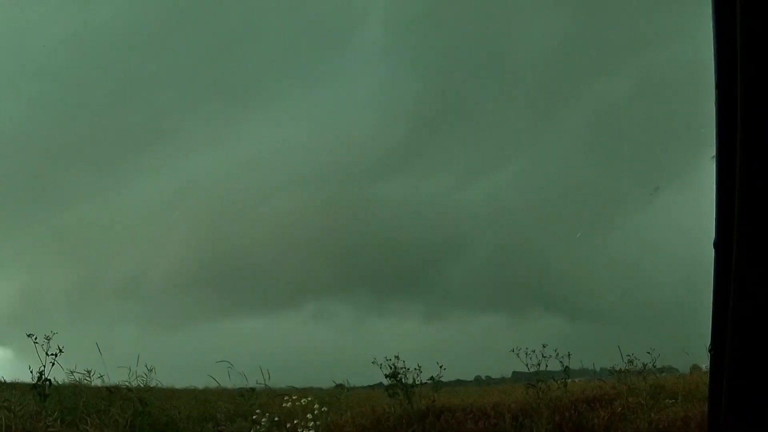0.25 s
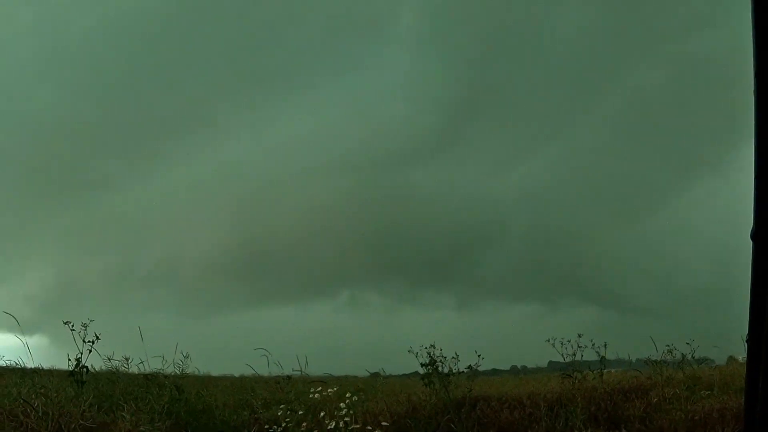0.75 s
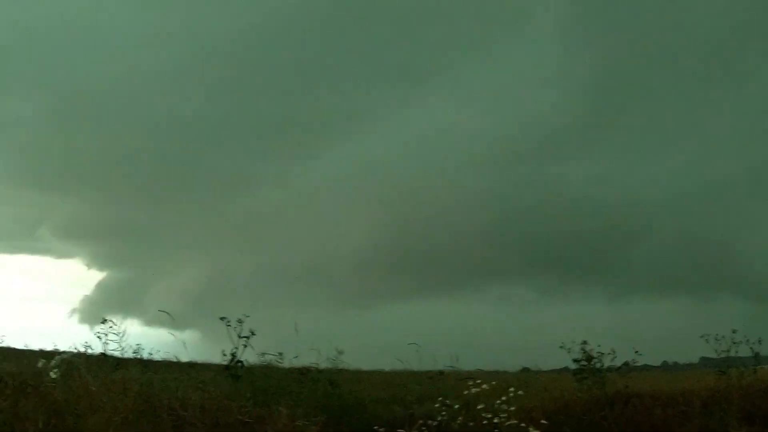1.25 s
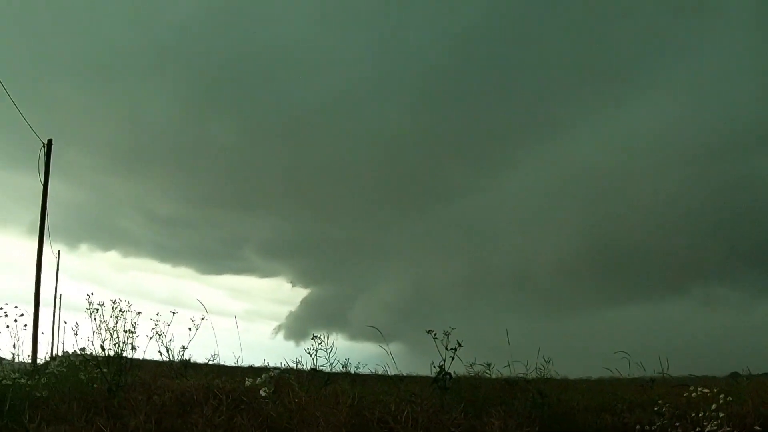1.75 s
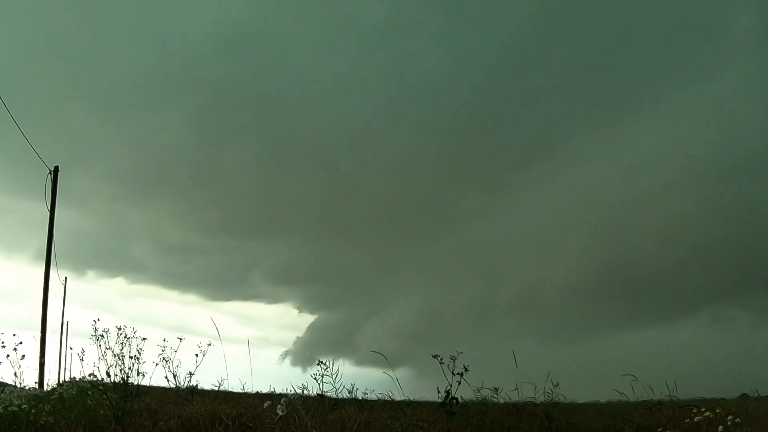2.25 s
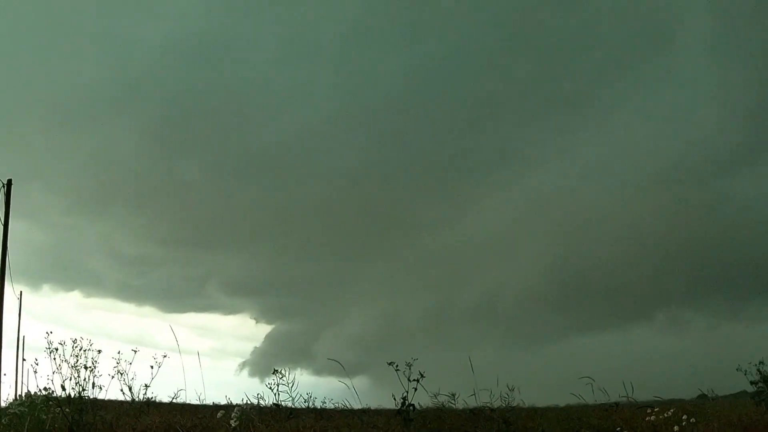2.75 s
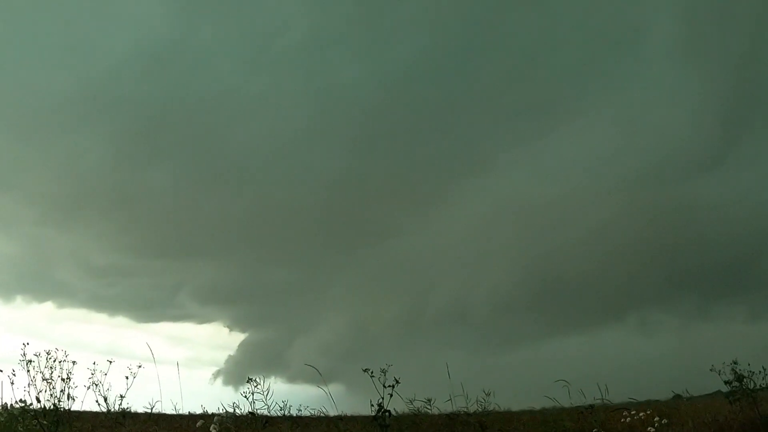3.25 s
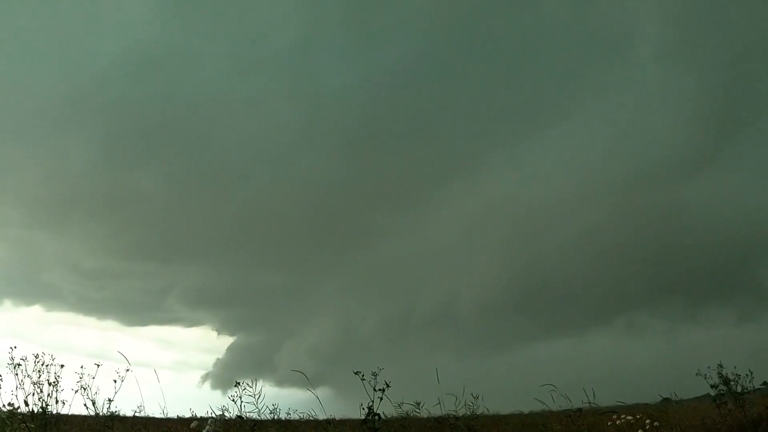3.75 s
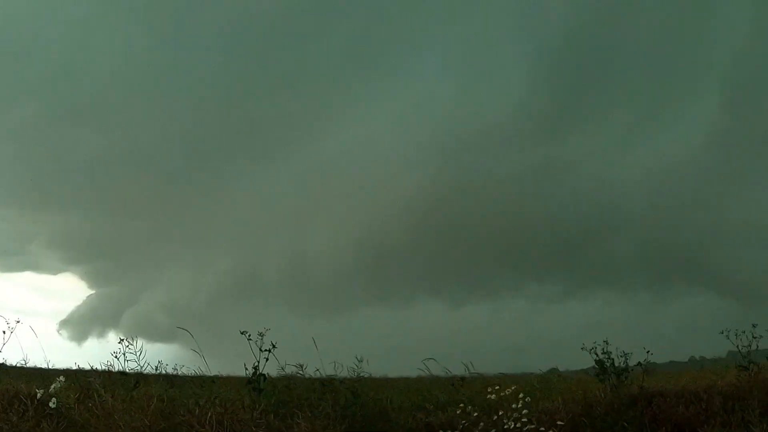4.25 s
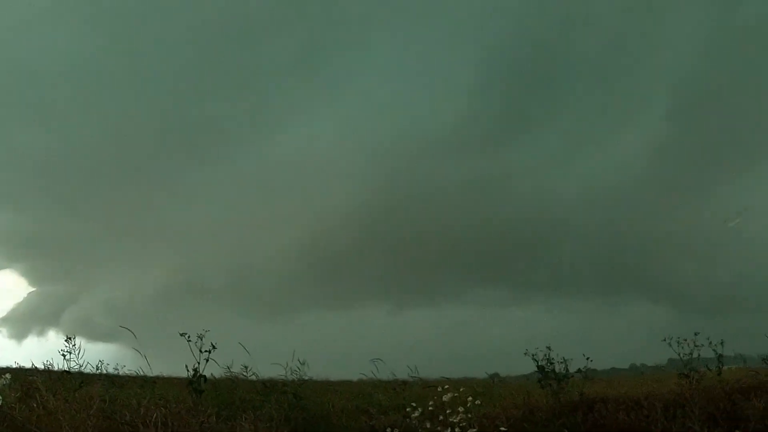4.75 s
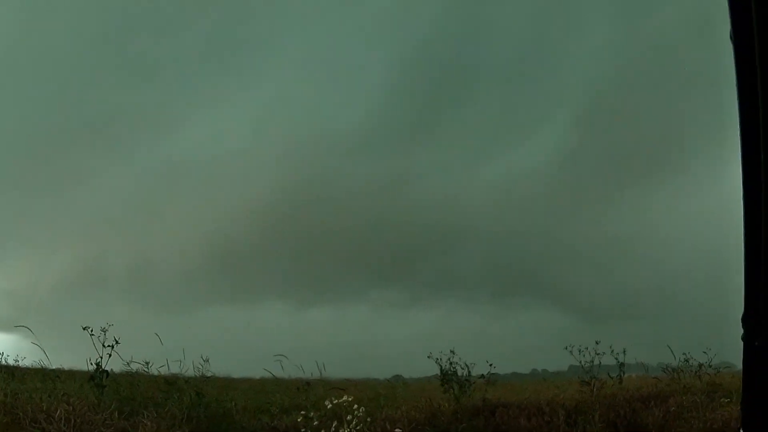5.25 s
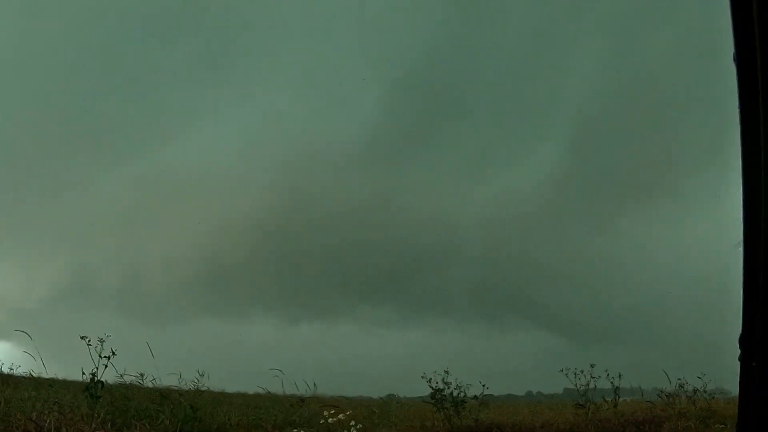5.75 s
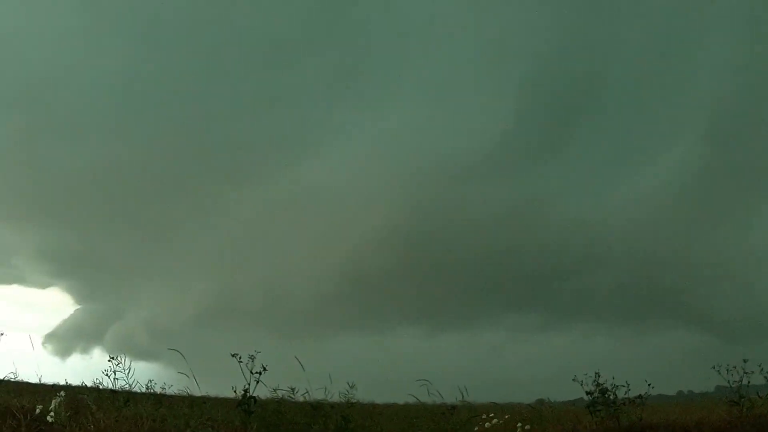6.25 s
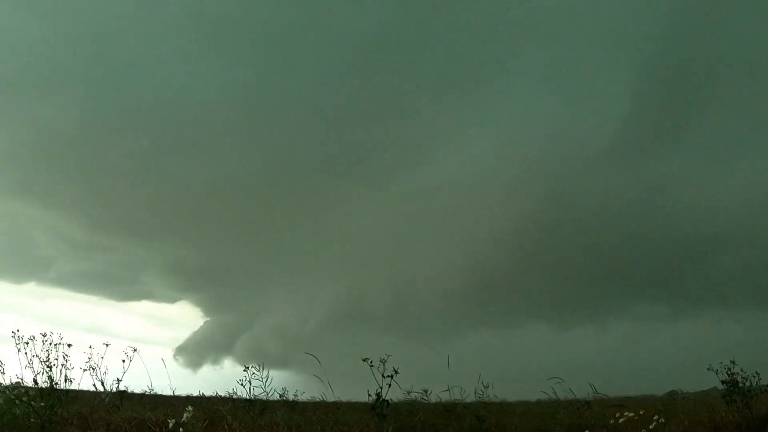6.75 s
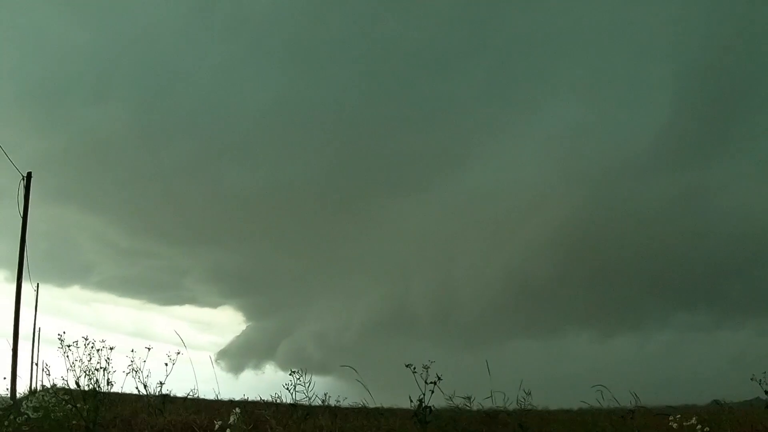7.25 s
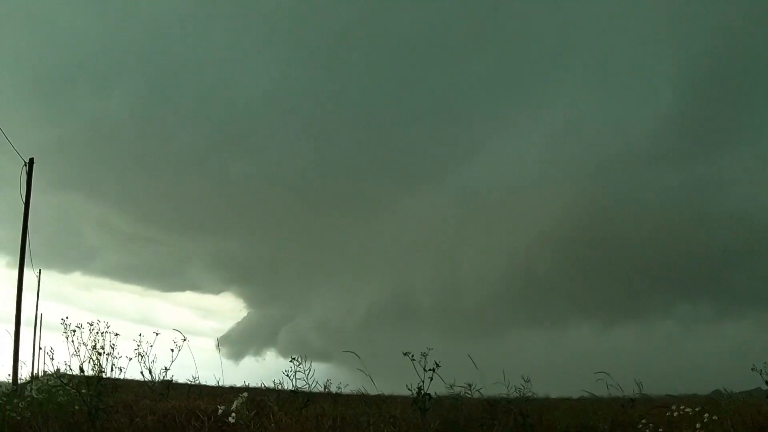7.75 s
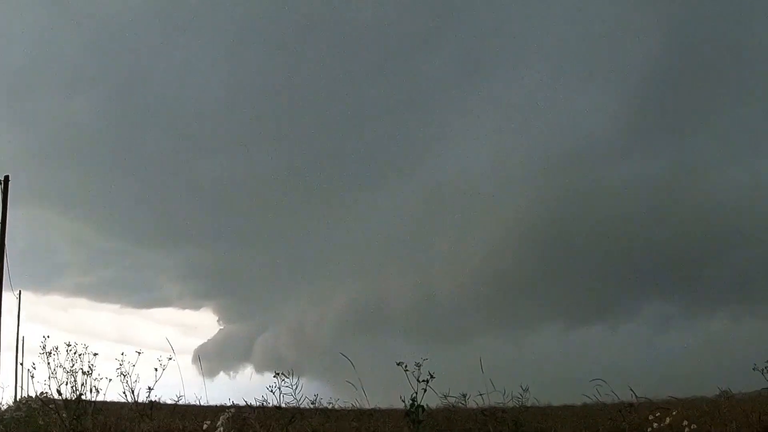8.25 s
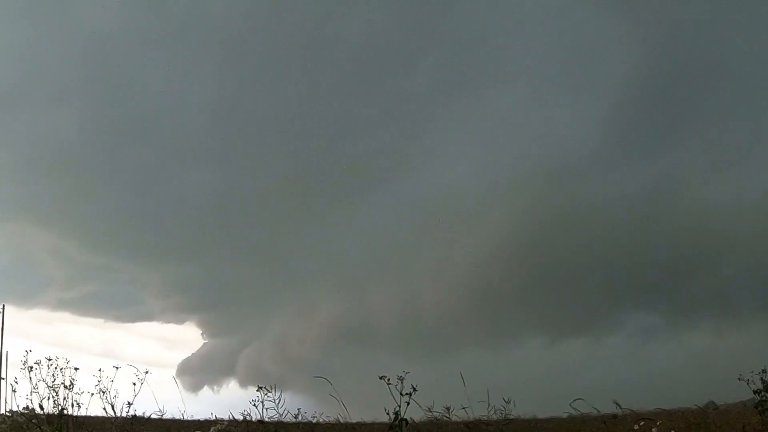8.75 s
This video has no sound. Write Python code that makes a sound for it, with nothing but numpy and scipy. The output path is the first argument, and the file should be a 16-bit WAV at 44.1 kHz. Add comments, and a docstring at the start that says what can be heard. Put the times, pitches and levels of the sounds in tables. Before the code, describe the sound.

From inside a car, a muffled downpour turns wide and loud, drops ticking near the window over deep gusty booms, then abruptly dulls again.

```python
"""Heavy rain drums on the body of a car and splashes outside, as noise full of random drops; open fields around.
The microphone is in the cabin: fat drops smack on the roof, near ones tick on the window frame (noise bursts),
small ones plink on the glass (resonances), faint, very high crackles sound at the top, and the wipers thud
(resonant noise) as they turn. Behind, wind and far thunder boom as low noise, jolts ring the cabin, and draught
and gusts reach the microphone. From 0.15 s until about 2.5 s, and again from 8.1 s, it is narrow and muffled."""
import sys
import numpy as np
from scipy import signal
from scipy.fft import rfft, irfft, next_fast_len
from scipy.io import wavfile
from scipy.ndimage import uniform_filter1d

SR = 44100
rng = np.random.default_rng(int(sys.argv[2]) if len(sys.argv) > 2 else 0)


def dump(signal):
    """Clip the signal to [-1, 1] and save it as 16-bit WAV at the path in sys.argv[1]."""
    limited = np.clip(np.atleast_2d(signal).T, -1, 1)
    pcm = np.round(limited * 32767).astype(np.int16)
    wavfile.write(sys.argv[1], SR, pcm)


N = 397341
TIME = np.arange(N) / SR
CUTOFF_HZ = 15750

# the downpour, in plateaus and sudden steps: (time [s], drumming [dB], splash [dB])
DOWNPOUR_LEVELS = [(0.148, -50, -62), (0.155, -46, -57.5), (2.3, -46.5, -58.5), (2.7, -45, -54),
                   (2.9, -43, -52.5), (4.148, -41.5, -51), (4.151, -36.5, -45.5), (4.85, -36.5, -44.5),
                   (7.5, -37, -45), (8.112, -35, -45.5), (8.118, -39, -53), (9.0, -37.5, -52)]
# sheets of rain that the wind throws on the car, and lulls: (time of the height [s], half length [s], rise [dB])
RAIN_SHEETS = [(0.612, 0.036, -2), (0.86, 0.055, 2.5), (0.956, 0.05, 4.5), (1.904, 0.041, 3.5),
               (2.047, .02, 3), (2.386, 0.022, 1.5), (2.76, 0.03, -4), (2.816, 0.026, 5),
               (2.94, 0.062, 2.5), (3.193, 0.039, 3), (3.778, 0.05, 2.5), (3.916, 0.036, -3),
               (3.998, 0.0092, 7.5), (4.115, 0.018, -3), (4.168, 0.012, 2), (4.868, 0.11, 1.4),
               (5.633, 0.036, 2.5), (6.421, 0.022, 2.5), (6.512, 0.028, 5.5), (7.56, .025, -3.5),
               (7.72, 0.013, 5), (8.192, 0.039, 6.5)]
# share of the narrow, muffled sound: (time [s], share [0-1])
NARROW_SHARE = [(.148, 0), (.155, 1), (2.09, 0.87), (2.55, 0.24), (2.8, 0.07), (8.112, 0.07), (8.118, 1)]
# rain colour when wide and clear: (frequency [Hz], relative density [dB])
CLEAR_COLOUR = [(100, -8), (300, 5.5), (480, 4.5), (700, 0), (1300, -1), (2300, -8), (3300, -10),
                (4500, -16.5), (6100, -9.5), (7600, -17), (8600, -22), (11000, -23.5), (15000, -26.5)]
# rain colour when narrow and muffled: (frequency [Hz], relative density [dB])
MUFFLED_COLOUR = [(100, -6.5), (330, 7.5), (750, 2), (950, -1), (1750, -3.5), (2800, -13.5), (3900, -8),
                  (4900, -11.5), (6400, -30.5), (8100, -32.5), (11100, -46), (12200, -27.5)]
# likeness of the rain at the two ears, later limited to -0.5..0.98: (frequency [Hz], likeness [-])
EAR_LIKENESS = [(290, 1.5), (640, 0.32), (1410, 0.03), (3100, 0.25), (6800, -0.1), (15000, -0.37)]
# balance of the wide rain: (frequency [Hz], left over right [dB])
RAIN_BALANCE = [(200, -4.5), (400, -5), (700, -3.5), (1300, 0.5), (2400, 1), (4400, -3), (8000, .5)]
# thin rain before the sound first turns narrow: (frequency [Hz], gain [dB])
THIN_START = [(300, -2), (480, -10), (1000, 3.5), (2600, 6), (4000, 4), (7000, -7.5)]
# a little more fizz in the muffled rain at the end: (frequency [Hz], gain [dB])
FIZZY_END = [(1300, -0.5), (3200, -3.5), (7000, 3.5), (10500, 2.5)]
# airy top of the rain, which dips briefly when the sound turns narrow again: (time [s], gain [dB])
AIRY_TOP = [(8.112, -6), (8.118, -28), (8.3, -20), (8.4, -6)]
# fat drops on the roof: (time [s], peak level [dB], bright splat against dull knock [dB])
ROOF_SMACKS = [(0.474, -38, -17), (0.575, -33.5, 1), (0.727, -36.5, -1), (0.808, -34, 0),
               (0.819, -29.5, -2), (0.935, -41, -7), (1.116, -33, -7), (1.511, -34, -9), (1.576, -31.5, -8),
               (1.889, -33, 0), (1.898, -37, -3), (1.995, -32, -7), (2.347, -34, -6), (2.388, -33.5, -14),
               (3.654, -33, -6), (3.947, -35, -12), (8.365, -29, -8)]
# near drops on the window frame:
# (time [s], peak level before balance [dB], pitch [Hz], left over right [dB], crack gain [dB])
FRAME_TICKS = [(3.434, -26, 5800, -11, -16.5), (3.7624, -30, 6500, 6, -9), (4.7255, -29, 4940, -.5, -33),
               (4.896, -29.5, 5700, 0.5, -16), (5.025, -32, 6000, -3.5, -26), (5.051, -22, 7360, 5, -14),
               (5.1986, -27, 6300, -3, -13), (5.259, -28.5, 5760, 0, -28), (5.461, -26, 4700, 7, -18),
               (5.503, -19.5, 4360, -2, -26), (5.504, -17, 6100, 5, -23), (6.223, -28, 5900, 6, -18),
               (6.527, -26, 5400, 6, -31), (7.172, -27, 3640, -6, -31), (7.861, -18, 5800, 4, -19),
               (8.045, -25.5, 5670, 1, -24)]
# clear high crackles: (time [s], peak level [dB])
CLEAR_CRACKLES = [(1.5646, -42), (1.7457, -47), (2.1104, -50), (6.588, -33)]
# wiper turns: (time [s], thud level [dB], cabin boom level [dB])
WIPER_TURNS = [(0.306, -36, -40), (.85, -43, -38.5), (1.3, -41, -43), (2.32, -37, -35.5),
               (3.31, -38, -37.5), (4.28, -40.5, -42), (4.83, -31.5, -39), (5.84, -39.5, -39),
               (6.83, -38, -43), (7.82, -37, -32.5), (8.32, -37, -40)]
WIPER_BOOM_LAG_S, WIPER_BOOM_S = 0.056, 0.091   # the cabin booms just after each turn: delay, half length
# steady wind under the rolls: (time [s], cabin boom level [dB], deep rumble level [dB])
STEADY_WIND = [(0.0, -47.5, -49), (.14, -44.5, -52), (.2, -39, -50), (1.3, -42.5, -45), (1.75, -44, -57),
               (2.2, -43, -45.5), (3.6, -44, -42), (5.55, -39.5, -44), (6.5, -37, -42), (8.1, -34, -41),
               (8.2, -34.5, -60), (9.0, -36, -44)]
# rolls of wind and far thunder: (start time [s], hold [s], cabin boom level [dB], deep rumble level [dB])
STORM_ROLLS = [(0.143, 0.018, -44, -43), (0.265, 0.0091, -42, -35), (0.46, 0.048, -37.5, -54),
               (0.747, 0.042, -36.5, -53), (.84, .01, -48, -33.5), (1.1, 0.047, -44, -38),
               (1.354, .16, -39.5, -45), (1.8, .03, -38, -46), (1.945, 0.1, -43, -34.5),
               (2.28, 0.12, -42, -41), (2.768, 0.13, -42, -38.5), (2.91, 0.027, -55, -33),
               (3.075, 0.3, -42, -33.5), (3.543, 0.057, -40.5, -33), (3.728, 0.35, -39, -34),
               (4.17, 0.21, -37, -57), (4.673, 0.065, -45, -34.5), (4.755, 0.17, -36, -34.5),
               (5.005, 0.21, -36.5, -36.5), (5.332, 0.044, -32, -46), (5.71, 0.12, -35.5, -45),
               (5.84, 0.11, -45, -31.5), (6.167, 0.026, -34, -37), (6.478, 0.13, -43, -40),
               (6.773, 0.23, -31, -35.5), (7.15, 0.16, -28.5, -38), (7.405, 0.069, -28.5, -49),
               (7.59, .03, -29.5, -48), (7.686, 0.13, -30.5, -33), (8.004, 0.027, -33.5, -32),
               (8.257, 0.23, -33.5, -35), (8.49, 0.027, -33, -48), (8.81, 0.13, -52, -41)]
ROLL_ATTACK_S, ROLL_RELEASE_S = 0.047, 0.048   # rise time, time constant of the fade
# colour of the cabin boom: (frequency [Hz], relative density [dB])
BOOM_COLOUR = [(30, -47), (65, -28), (95, -14), (125, -1.5), (168, 0.3), (205, -3), (240, -9.5),
               (300, -17.5), (500, -47), (2000, -110)]
# colour of the deep rumble: (frequency [Hz], relative density [dB])
RUMBLE_COLOUR = [(5, -38), (22, 5), (33, -5), (46, 15), (60, 2.5), (80, -8.5), (130, -32), (1000, -110)]
# jolts of wind that set the cabin ringing: (time [s], peak of the swing [dB], pitch [Hz])
CABIN_THUMPS = [(.385, -21, 168), (1.305, -25, 169), (3.845, -26, 160), (4.963, -20, 135),
                (8.334, -21.5, 170)]
# gusts that bump the microphone: (time [s], peak level before balance [dB], pitch [Hz], left over right [dB])
MICROPHONE_BUFFETS = [(3.217, -20, 69, -19), (3.317, -21, 59.7, -11), (3.867, -24.5, 73.5, -5),
                      (4.006, -17.5, 75, -18), (4.087, -18.5, 71, -10), (4.145, -19.5, 87, -22),
                      (4.959, -23, 116, -6), (5.901, -19, 55, 1), (5.928, -22, 37.6, -12),
                      (7.812, -16, 95, -2), (7.908, -17, 110, -5)]


def from_db(db):
    """Decibels to gain."""
    return 10 ** (np.asarray(db) / 20)


def rms_one(x):
    """Scale to rms 1."""
    return x / np.sqrt(np.mean(x ** 2) + 1e-20)


def in_time(rows):
    """One curve over time for each column of a table after the first."""
    s, *columns = np.transpose(rows)
    return [np.interp(TIME, s, column) for column in columns]


def over_hz(points, hz):
    """Read a table on a log-frequency axis."""
    at, value = np.transpose(points)
    return np.interp(np.log(hz), np.log(at), value)


def filtered(x, gain_at):
    """Filter by a smooth gain that is a function of frequency."""
    size = next_fast_len(N, True)
    hz = np.maximum(np.arange(size // 2 + 1) * SR / size, 1)
    return irfft(rfft(x, size) * gain_at(hz), size)[..., :N]


def airy(x, hz):
    """The part of a sound above a frequency."""
    return filtered(x, lambda f: 1 - 1 / (1 + (f / hz) ** 12))


def band_pass(x, low_hz, high_hz):
    """Keep one band of frequencies."""
    band = [low_hz, min(high_hz, .45 * SR)]
    return signal.sosfilt(signal.butter(2, band, "band", fs=SR, output="sos"), x)


def resonance(x, hz, width_hz):
    """A two-pole resonance with gain 1 on top."""
    r = np.exp(-np.pi * width_hz / SR)
    feed = np.array([1, 0, -1]) * (1 - r * r) / 2
    return signal.lfilter(feed, [1, -2 * r * np.cos(2 * np.pi * hz / SR), r * r], x + 1e-18)


def drift(rate_hz):
    """Slow random wandering with rms 1: smoothed noise, drawn every 40 samples and joined by lines."""
    r = np.exp(-80 * np.pi * rate_hz / SR)
    noise = rng.standard_normal(N // 40 + 2002)
    slow = signal.lfilter([1], [1, -2 * r, r * r], noise)[2000:]   # drop the filter's start
    return np.interp(np.arange(N) / 40, np.arange(len(slow)), rms_one(slow))


def swell(s, half_s):
    """A smooth rise and fall of height 1 around a moment."""
    out, near = np.zeros(N), np.abs(TIME - s) < 4 * half_s
    out[near] = np.exp(-((TIME[near] - s) / half_s) ** 2)
    return out


def panned(left_over_right_db):
    """Left and right gains for a level difference."""
    return from_db(np.array([[.5], [-.5]]) * left_over_right_db)


def add(out, s, sound):
    """Mix a short stereo sound in at a time."""
    at = int(np.clip(s * SR, 0, N - 1))
    out[:, at:at + sound.shape[-1]] += sound[:, :N - at]


def random_table(per_s, columns):
    """Independent chances from 0 to 1, one row for each random event."""
    return np.random.default_rng(rng.integers(1 << 30)).random((int(per_s * N / SR), columns))


def patter(per_s, spread_db, colour_db, splat_s, tail_s, tail_db):
    """Random drops: each a sharp splat of its own size and colour, with a short tail in the cabin. Rms 1."""
    chance = random_table(per_s, 6)
    at = (chance[:, 0] * N).astype(int)
    size_db = spread_db * np.minimum(-np.log(1 - chance[:, 1]), 3.5)
    drop_colour_db = colour_db * (2 * chance[:, 2:].T - 1)
    # drops blur together in the lows and stand apart most in the third band
    contrast = np.array([[.4], [.85], [1.1], [.85]])
    energy = np.zeros((4, N)) + 1e-18
    energy[:, at] = from_db(contrast * (size_db + drop_colour_db)) ** 2

    def fading(seconds):
        return signal.lfilter([1], [1, -np.exp(-2 / (seconds * SR))], energy)

    envelope = np.sqrt(fading(splat_s) + from_db(tail_db) ** 2 * fading(tail_s))
    splats = envelope * rng.standard_normal((4, N))
    edges_hz = [200, 1100, 2700, 6000, 18000]
    bands = zip(splats, edges_hz, edges_hz[1:])
    return rms_one(sum(band_pass(rms_one(splat), low, high) for splat, low, high in bands))


def rain(near_db, focus_db, flurry_db, light_flurry_db, flurry_rate_hz, spray_hz, spray_follows):
    """Far rain merges into a wash, near rain stays grainy; flurries are stronger the lighter the rain."""
    drum_db, splash_db = in_time(DOWNPOUR_LEVELS)
    narrow = np.clip(in_time(NARROW_SHARE)[0], 0, 1)

    sheets_db = sum(rise_db * swell(s, half_s) for s, half_s, rise_db in RAIN_SHEETS)
    lightness = np.clip((drum_db.max() - drum_db) / 10, 0, 1)
    flurry_depth_db = flurry_db + light_flurry_db * lightness
    flurries = from_db(flurry_depth_db * np.clip(drift(flurry_rate_hz), -2, 2) + sheets_db)

    near = np.array([patter(per_s=340, spread_db=2.0, colour_db=11.0, splat_s=0.0022, tail_s=0.017, tail_db=-9)
                     for _ in ("mid", "side")])
    near = near * from_db(near_db + focus_db * narrow)   # single drops stand out more while narrow
    grains = rng.standard_normal((2, N)) + near
    spray = filtered(grains, lambda hz: 1 / (1 + (spray_hz / hz) ** 6))
    # the fine spray follows the flurries less
    mid, side = flurries * (grains - spray) + flurries ** spray_follows * spray

    def alike(hz):
        return np.clip(over_hz(EAR_LIKENESS, hz), -.5, .98)

    shared = filtered(mid, lambda hz: np.sqrt(1 + alike(hz)))
    opposed = filtered(side, lambda hz: np.sqrt(1 - alike(hz))) * [[1], [-1]]
    wide = filtered(shared + opposed,
                    lambda hz: from_db(over_hz(CLEAR_COLOUR, hz)) * panned(over_hz(RAIN_BALANCE, hz)))
    dull = filtered(mid, lambda hz: from_db(over_hz(MUFFLED_COLOUR, hz)))
    out = 0
    for sound, share in ((wide, 1 - narrow), (dull, narrow)):
        drumming = filtered(sound, lambda hz: 1 / (1 + (hz / 2500) ** 8))
        splash = sound - drumming
        levelled = from_db(drum_db) * rms_one(drumming) + from_db(splash_db) * rms_one(splash)
        out = out + np.sin(np.pi / 2 * share) * levelled   # even-power crossfade
    return out


def coloured_rain(shower):
    """The rain is thin at the start and fizzier at the end, with a level of its own for the airy top."""
    thin = filtered(shower, lambda hz: from_db(over_hz(THIN_START, hz)))
    shower = np.where(TIME < NARROW_SHARE[0][0], thin, shower)
    fizzy = filtered(shower, lambda hz: from_db(over_hz(FIZZY_END, hz)))
    shower = np.where(TIME > NARROW_SHARE[-1][0], fizzy, shower)
    return shower + (from_db(in_time(AIRY_TOP)[0]) - 1) * airy(shower, hz=9860)


def smacks(knock_s, splat_s, knock_low_hz, knock_high_hz, splat_low_hz, splat_high_hz):
    """A fat drop starts at once: the roof panel knocks, and the water splats brighter and shorter."""
    out, t = np.zeros((2, N)), np.arange(SR // 20) / SR

    def burst(seconds, *band):
        noise = rng.standard_normal(len(t)) * np.exp(-t / seconds)
        return band_pass(band_pass(noise, *band), *band)

    for s, db, bright_db in ROOF_SMACKS:
        knock = burst(knock_s, knock_low_hz, knock_high_hz)
        smack = knock + from_db(bright_db) * burst(splat_s, splat_low_hz, splat_high_hz)
        add(out, s, from_db(db) * smack / np.abs(smack).max() * np.ones((2, 1)))
    return out


def ticks(splat_s, ring_ratio, knock_db, knock_ratio):
    """A near drop bursts in milliseconds: a bright ring, a duller knock of the frame and a fine, broad crack."""
    out, t = np.zeros((2, N)), np.arange(SR // 20) / SR
    for s, db, hz, balance_db, crack_db in FRAME_TICKS:
        splat = rng.standard_normal((2, len(t))) * np.exp(-t / splat_s)
        frame = splat + .5 * splat[::-1]   # both ears hear much the same from the frame
        ring = band_pass(frame, hz / (1 + ring_ratio), hz * (1 + ring_ratio))
        knock = band_pass(frame, hz / knock_ratio, hz)
        tick = ring + from_db(knock_db) * knock + from_db(crack_db) * splat
        add(out, s, from_db(db) * tick / np.abs(tick).max() * panned(balance_db))
    return out


def plinks(per_s, level_db, low_hz, high_hz, cycles, spread_db):
    """Small drops on the glass ring briefly at one of ten pitches, each at its own place; they follow the splash."""
    drops = random_table(per_s, 4)
    at = (drops[:, 0] * N).astype(int)
    sizes = from_db(spread_db * np.minimum(-np.log(1 - drops[:, 1]), 3)) * panned(12 * (drops[:, 2] - .5))
    pitches, out = np.geomspace(low_hz, high_hz, 10), 0
    for k, hz in enumerate(pitches):
        mine = (drops[:, 3] * len(pitches)).astype(int) == k
        clicks = np.zeros((2, N))
        clicks[:, at[mine]] = sizes[:, mine]
        out = out + resonance(resonance(clicks, hz, hz / cycles), hz, hz / cycles)
    return rms_one(out) * from_db(in_time(DOWNPOUR_LEVELS)[1] + level_db)


def crackles(per_s, faint_db, spread_db, burst_s, above_hz):
    """Tiny crackles at the very top, different at each ear: a few clear ones among many faint ones."""
    out, t = np.zeros((2, N)), np.arange(SR // 100) / SR
    chance = random_table(per_s, 2)
    faint = [(when * N / SR, faint_db + spread_db * size ** 2) for when, size in chance]
    for s, db in CLEAR_CRACKLES + faint:
        burst = rng.standard_normal((2, len(t))) * np.exp(-t / burst_s)
        crackle = band_pass(burst, above_hz, CUTOFF_HZ)
        add(out, s, from_db(db) * crackle / np.abs(crackle).max())
    return out


def wipers(hz, width_hz, swell_s):
    """At each turn the rubber blades flip over with a soft, hollow thud of resonant noise."""
    turns = sum(from_db(db) * swell(s, swell_s) for s, db, _ in WIPER_TURNS)
    rub = resonance(resonance(rng.standard_normal(N), hz, width_hz), hz, width_hz)
    return turns * rms_one(rub) * panned(-2.2)


def roll(s, hold_s):
    """Attack, hold and release of one roll."""
    attack = np.clip((TIME - s) / ROLL_ATTACK_S, 0, 1)
    since_hold = np.maximum(TIME - s - hold_s - ROLL_ATTACK_S, 0)
    return attack * np.exp(-since_hold / ROLL_RELEASE_S)


def storm_strength():
    """Gains of cabin boom and deep rumble: steady wind and rolls add in power, wiper turns join the boom."""
    boom_power, rumble_power = from_db(in_time(STEADY_WIND)) ** 2
    for s, hold_s, boom_db, rumble_db in STORM_ROLLS:
        shape = roll(s, hold_s) ** 2
        boom_power = boom_power + from_db(boom_db) ** 2 * shape
        rumble_power = rumble_power + from_db(rumble_db) ** 2 * shape
    for s, _, boom_db in WIPER_TURNS:
        boom_power = boom_power + (from_db(boom_db) * swell(s + WIPER_BOOM_LAG_S, WIPER_BOOM_S)) ** 2
    return np.sqrt(boom_power), np.sqrt(rumble_power)


def low_roar(spectrum, side_db, balance_db, steady_s):
    """Low noise, mostly shared by both ears; the shared part is held to an even strength."""
    mid, side = filtered(rng.standard_normal((2, N)), lambda hz: from_db(over_hz(spectrum, hz)))
    mid = mid / np.sqrt(uniform_filter1d(mid ** 2, max(int(steady_s * SR), 2)) + 1e-12)
    return (mid + from_db(side_db) * rms_one(side) * [[1], [-1]]) * panned(balance_db)


def storm(boom, rumble):
    """Wind and far thunder: a deep rumble and the boom of the cabin, both of low noise."""
    return (boom * low_roar(BOOM_COLOUR, side_db=-20.5, balance_db=-1.5, steady_s=0.088)
            + rumble * low_roar(RUMBLE_COLOUR, side_db=-7.5, balance_db=-0.5, steady_s=0.11))


def thumps(rise_s):
    """The air in the cabin swings up in a few cycles and dies away."""
    out, t = np.zeros((2, N)), np.arange(SR // 6) / SR
    shape = (t / rise_s * np.exp(1 - t / rise_s)) ** 2
    for s, db, hz in CABIN_THUMPS:
        swing = np.sin(2 * np.pi * (hz * t + rng.random()))
        add(out, s, from_db(db) * shape * swing * np.ones((2, 1)))
    return out


def draught(strength, level_db, hz, width_hz, lumps_db, balance_db):
    """Wind flutters on each microphone port in lumps, rising and falling with the storm."""
    eddies = rng.standard_normal((2, N)) + rng.standard_normal(N)   # the larger ones reach both ports
    flutter = resonance(resonance(eddies, hz, width_hz), hz, width_hz)
    lumpy = rms_one(flutter * from_db(lumps_db * drift(4.9)))
    return strength * from_db(level_db) * lumpy * panned(balance_db)


def buffets(cycles):
    """An eddy passes the microphone: one dip of pressure with a swing on each side."""
    out, t = np.zeros((2, N)), np.arange(-SR // 20, SR // 20) / SR
    for s, db, hz, balance_db in MICROPHONE_BUFFETS:
        dip = -np.cos(2 * np.pi * hz * t) * np.exp(-(hz * t / cycles) ** 2)
        add(out, s + t[0], from_db(db) * dip * panned(balance_db))
    return out


def scene():
    """Rain, small sounds and storm; as the sound narrows all close to the centre, draught and plinks fade out."""
    narrow = np.clip(in_time(NARROW_SHARE)[0], 0, 1)
    shower = coloured_rain(rain(near_db=-0.63, focus_db=3.5, flurry_db=1.08, light_flurry_db=1.0,
                                flurry_rate_hz=21.5, spray_hz=4840, spray_follows=0.4))
    small_sounds = (smacks(knock_s=0.0042, splat_s=0.0038, knock_low_hz=750, knock_high_hz=2200,
                           splat_low_hz=2890, splat_high_hz=4950)
                    + ticks(splat_s=0.001, ring_ratio=0.16, knock_db=-9, knock_ratio=2.76)
                    + crackles(per_s=45, faint_db=-66.5, spread_db=8, burst_s=0.0014, above_hz=12200))
    glass = plinks(per_s=70, level_db=-14.0, low_hz=4630, high_hz=6840, cycles=5.1, spread_db=8.5)
    boom, rumble = storm_strength()
    lows = (wipers(hz=279, width_hz=59, swell_s=0.034) + storm(boom, rumble)
            + thumps(rise_s=0.0084) + buffets(cycles=0.39))
    wind = draught(np.sqrt(boom * rumble), level_db=-4.5, hz=89.4, width_hz=55, lumps_db=3.0, balance_db=-5.0)
    events = small_sounds + lows
    return shower + (1 - narrow) * (events + wind + glass) + narrow * events.mean(axis=0)


def record(dry):
    """The top is cut steeply."""
    return filtered(dry, lambda hz: 1 / np.sqrt(1 + (hz / CUTOFF_HZ) ** 300))


dry = scene()
out = record(dry)
dump(out)
```